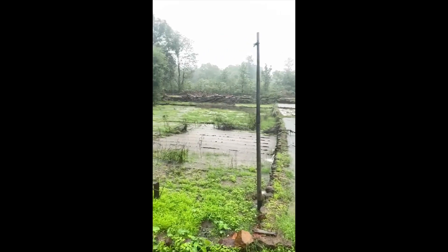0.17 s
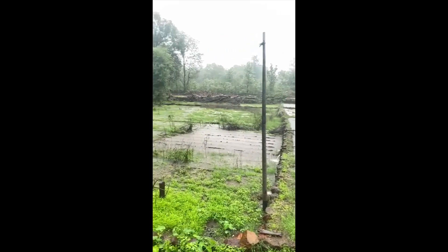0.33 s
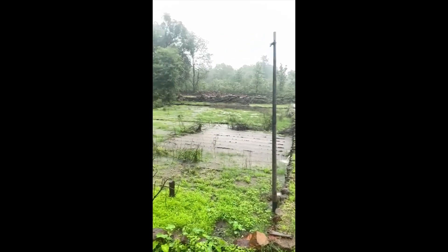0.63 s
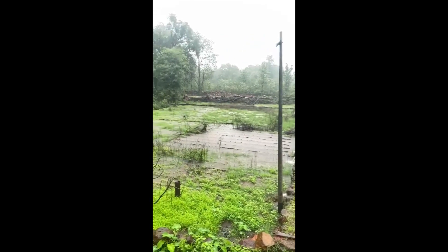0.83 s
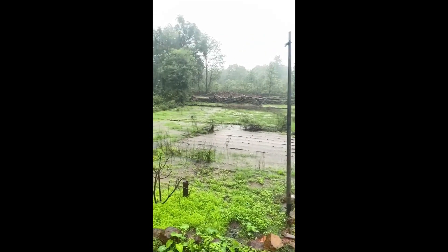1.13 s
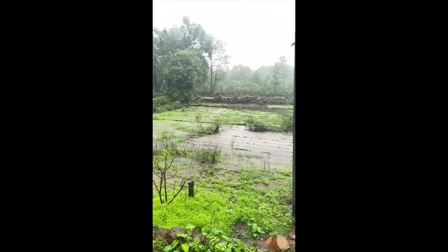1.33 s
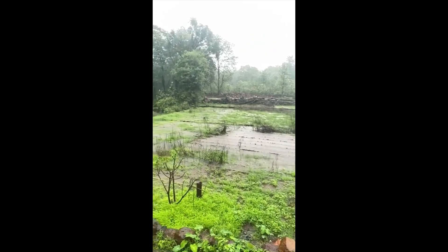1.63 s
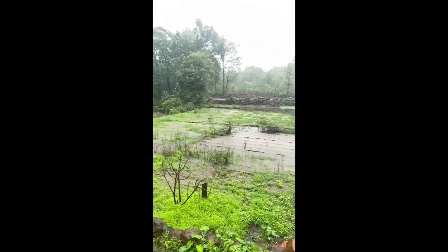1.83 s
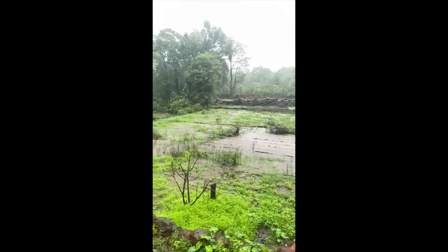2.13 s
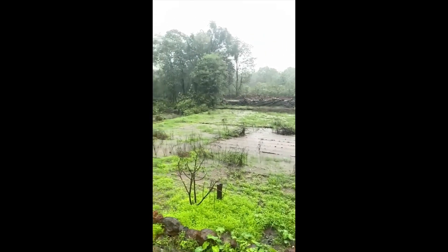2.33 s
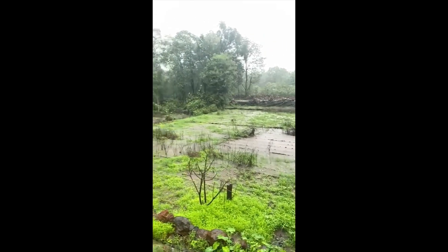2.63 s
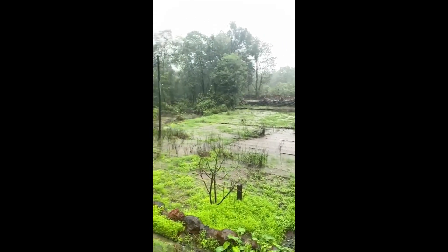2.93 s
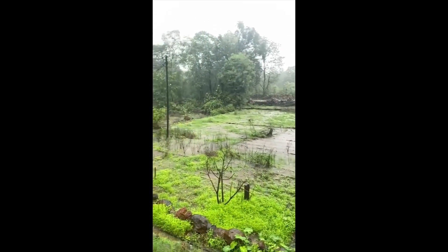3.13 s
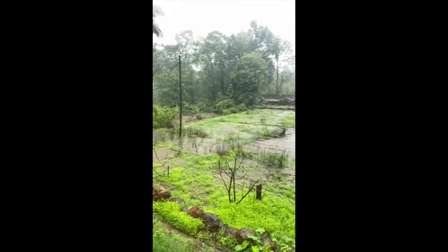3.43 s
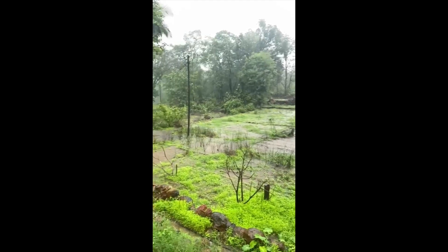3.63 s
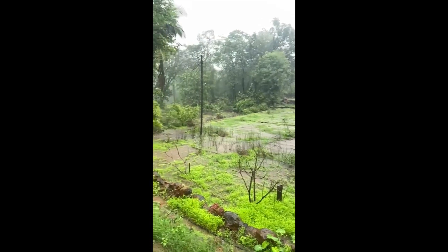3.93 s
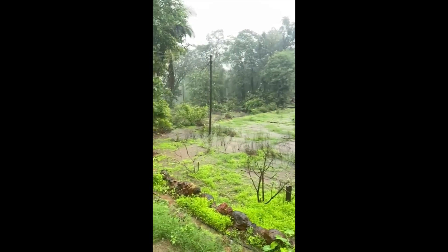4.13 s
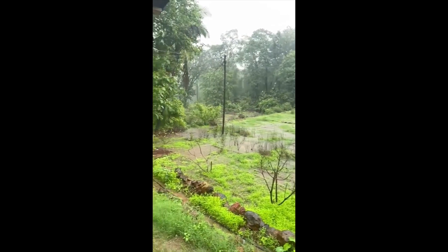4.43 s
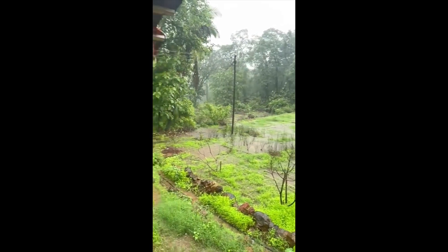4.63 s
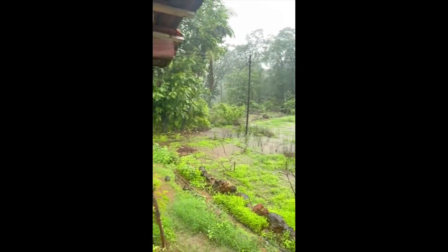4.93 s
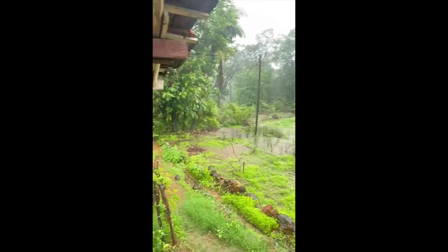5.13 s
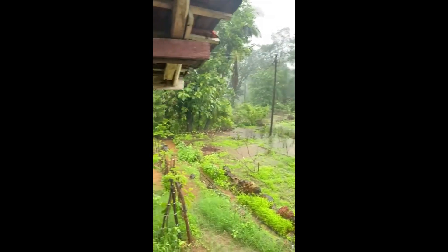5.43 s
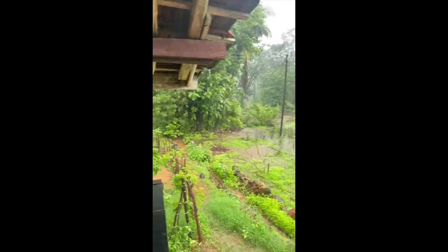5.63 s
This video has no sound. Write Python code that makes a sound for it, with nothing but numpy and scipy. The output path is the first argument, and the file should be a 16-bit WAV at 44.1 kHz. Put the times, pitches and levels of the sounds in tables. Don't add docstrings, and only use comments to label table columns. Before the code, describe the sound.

Continuous downpour in an open rural place, captured by a small handheld stereo microphone under the eaves. Far rain merges into a roar while nearer splashes crackle densely. Sharp drops snap close by, strongest before two seconds and again at five. Low hollow booms come mostly in the first two seconds; a very faint thin insect whine barely surfaces. The rain never pauses.

```python
import sys
import numpy as np
from scipy import signal
from scipy.fft import rfft, irfft, dct, next_fast_len
from scipy.io import wavfile
from scipy.ndimage import uniform_filter1d, map_coordinates

SR = 44100
rng = np.random.default_rng(int(sys.argv[2]) if len(sys.argv) > 2 else 0)


def wav_out(sig):
    wavfile.write(sys.argv[1], SR, np.round(np.clip(np.atleast_2d(sig).T, -1, 1) * 32767).astype(np.int16))


def attenuation_scalar(level_db):
    decades = np.asarray(level_db, float) / 20
    return 10 ** decades


N = 254456

# [t/s, level/dB]
RAIN_STRENGTH = [
    (0.0, -23.5),
    (0.98, -24),
    (1.04, -24.5),
    (1.11, -23),
    (1.61, -24),
    (5.13, -23.5),
    (5.17, -23),
    (5.77, -23.5),
]
# [f/Hz, density/dB per Hz]
ROAR_MID = [(20, -64), (40, -58.5), (60, -45.5), (100, -46.5), (200, -43), (260, -44), (420, -42.5),
            (510, -45), (700, -43), (800, -45.5), (1400, -45.5)]
ROAR_SIDE = [(20, -80), (40, -68), (60, -60), (100, -72), (150, -68.5), (250, -60.5), (400, -54.5),
             (700, -51.5), (1400, -52)]
PATTER_MID = [(800, -47), (1700, -49), (2400, -47.5), (3100, -50), (4000, -50.5), (4700, -52.5),
              (5400, -51.5), (6000, -54.5), (6500, -64.5), (8200, -67.5), (8800, -59.5), (9400, -58.5),
              (11600, -61.5), (12400, -72.5)]
PATTER_SIDE = [(800, -49.5), (1600, -55.5), (1850, -59), (2400, -50), (3100, -50), (4000, -54.5),
               (4600, -55), (5350, -57), (6500, -54), (7900, -56.5), (8900, -57.5), (9400, -72),
               (9900, -62.5), (10900, -62), (12400, -73)]
# [f/Hz, width/Hz, boost/dB]
ROOF_HOLLOW = [
    (59, 10, 4),
    (145, 14, 7),
    (175, 24, 3),
    (220, 10, 3),
]
# [f/Hz, lean to the left/-1..1]
SIDE_LEAN = [(150, -0.0081), (340, -0.79), (700, -.1), (1200, -0.012), (2000, -0.066)]
# [f/Hz, lag of one port/-1..1]
SIDE_LAG = [(700, 0.18), (1400, -0.26), (2100, 0.2), (3100, -0.072), (4100, 0.15), (4900, 0.038),
            (6100, 0.63), (6800, 0.48), (7900, 0.069), (8800, 0.24), (9600, -0.11), (10300, 0.49),
            (11200, 0.37)]
# [t/s, peak/dB, f/Hz, ring/cycles, pan L-R/dB]
NEAR_DROPS = [(.086, -26, 5000, 2, -10), (.471, -14, 2650, 2.6, -8), (0.479, -17, 4000, 1.3, 0),
              (.600, -13, 3870, 1.3, -7), (1.097, -15, 4570, 3.6, -5), (1.107, -14, 4570, 2.7, 9),
              (1.7087, -5.5, 7400, 2.5, -1), (1.7083, -17, 4000, 1.5, -4), (1.7086, -15, 5700, 1.5, 0),
              (1.7089, -16, 9900, 1.5, 0), (2.925, -17, 5040, 0.91, -6), (2.891, -16, 3980, 1.6, 5),
              (3.3662, -12, 7310, 2, -2), (3.3663, -14, 9700, 4, -3), (3.3684, -17, 9800, 3, -3),
              (3.5572, -13, 2680, 1.5, -1), (3.5578, -11, 4740, 2.1, -2), (3.5625, -16, 5170, 4, -9),
              (3.742, -18, 4970, 1.8, 3), (4.12, -20, 2550, 30, 6), (4.221, -21, 2940, 20, -5),
              (4.3217, -11, 5200, 3, 5), (4.398, -25, 5000, 2.4, -3), (5.0116, -6, 6900, 1.8, 0),
              (5.252, -19, 5000, 2, -6), (5.262, -18, 5040, 1.5, 2), (5.631, -22, 5000, 2, 6)]
# [t/s, peak/dB, f/Hz, ring/cycles, pan L-R/dB]
SMALL_DROPS = [(0.024, -17, 3180, 2.5, 3), (0.2131, -19, 4540, 3, 7), (0.7044, -18, 2680, 2.7, -10),
               (1.1571, -20, 4170, 3, 7), (1.8685, -21, 4350, 3.7, -6), (2.6743, -21, 2810, 2.8, -9),
               (2.8568, -22, 2730, 4.6, 14), (3.1225, -18, 2780, 2.7, -5), (3.3287, -23, 3170, 3, -9),
               (3.3889, -18, 2700, 3, -6), (3.5944, -24, 3140, 3, -8), (3.611, -22, 2870, 3, 6),
               (3.7337, -17, 3170, 3, -5), (3.839, -23, 2780, 3, 5), (3.9354, -19, 2620, 3, -1),
               (4.031, -23, 10150, 3, -2), (4.4276, -22, 4130, 3, 4), (4.513, -23, 4500, 3, -2),
               (4.8593, -19, 2970, 2.3, 13), (4.897, -29, 10400, 3, 5), (5.1497, -20, 2890, 3, -2),
               (5.1783, -23, 3080, 3, -4), (5.271, -22, 4310, 3, 9), (5.45, -22, 4570, 3, -1),
               (5.5024, -27, 9820, 3, 8)]
# [f/Hz, phase/rad]
PORT_PHASE = [(2500, 1.3), (5300, 0.69), (7000, 3.5), (8200, 2.4), (9500, 6)]
# [start/s, end/s, f/Hz, level/dB]
INSECT_NOTES = [
    (2.248, 2.42, 11545, -60),
    (3.14, 3.36, 11545, -59),
    (5.02, 5.21, 11600, -64),
]
# [middle/s, length/s, f/Hz, level/dB]
EAVES_BOOMS = [(.9, 2.2, 147.3, -39), (.05, 0.24, 161, -29), (0.544, .1, 167.8, -28),
               (0.877, 0.25, 146, -30), (1.252, 0.24, 150, -26.5), (1.488, 0.1, 169, -29),
               (1.751, 0.052, 160.2, -27), (1.832, 0.079, 170, -31), (2.4, .15, 153, -33),
               (2.518, 0.29, 56.4, -40), (2.91, 0.058, 62, -33), (4.004, .08, 148.7, -29),
               (4.484, 0.19, 149, -32), (4.552, .12, 215, -30), (5.17, 0.087, 221, -32),
               (5.18, 0.11, 150.3, -30), (5.198, 0.51, 57, -43), (5.62, 0.27, 57, -39)]
# [start/s, end/s]
MID_SIDE_SPANS = [(0.01, 0.19), (0.68, 0.98), (1.75, 1.86), (2.45, 2.54), (2.63, 2.89), (2.98, 3.3),
                  (3.4, 3.51), (4.35, 4.53), (4.68, 4.72)]
# [f/Hz, grain/dB]
GRAIN_STEP = [(200, -31), (900, -14), (1600, -11), (5000, -9), (11000, -8)]
# [start/s, end/s]
RICH_SPANS = [(0.077, 0.1), (0.379, 0.402), (0.449, 0.495), (0.658, 0.704), (1.075, 1.168), (1.447, 1.493),
              (1.517, 1.563), (1.679, 1.726), (2.027, 2.051), (2.213, 2.26), (2.399, 2.422), (2.608, 2.654),
              (2.771, 2.794), (2.817, 2.84), (2.933, 2.98), (3.049, 3.072), (3.142, 3.212), (3.351, 3.397),
              (3.537, 3.583), (3.769, 3.792), (3.908, 3.932), (4.094, 4.14), (4.257, 4.349), (4.419, 4.442),
              (4.744, 4.814), (4.93, 5.023), (5.255, 5.301), (5.394, 5.441), (5.557, 5.603)]
# [start/s, end/s, low edge/Hz]
BAND_FILLS = [(0.031, 0.077, 6460), (0.054, 0.077, 6895), (0.054, 0.123, 7580), (0.681, 0.704, 6460),
              (0.82, 0.866, 6460), (0.843, 0.89, 6895), (0.843, 0.89, 7580), (0.89, 0.913, 6460),
              (1.029, 1.075, 7580), (1.052, 1.099, 6895), (1.052, 1.145, 6460), (1.261, 1.284, 6460),
              (1.633, 1.656, 6460), (1.633, 1.656, 6895), (1.679, 1.726, 6460), (1.679, 1.749, 6895),
              (1.679, 1.749, 7580), (2.074, 2.097, 6460), (2.283, 2.306, 6460), (2.306, 2.329, 7580),
              (2.376, 2.422, 6460), (2.445, 2.469, 6460), (2.608, 2.654, 6460), (2.608, 2.654, 7580),
              (2.608, 2.678, 6895), (2.771, 2.794, 6460), (2.794, 2.817, 7580), (2.817, 2.84, 6895),
              (2.933, 2.956, 6460), (2.933, 2.956, 7580), (2.956, 3.026, 6895), (2.98, 3.026, 6460),
              (3.072, 3.096, 6460), (3.328, 3.397, 6460), (3.351, 3.374, 6895), (3.351, 3.374, 7580),
              (3.467, 3.49, 6460), (3.467, 3.49, 7580), (3.56, 3.606, 6460), (3.653, 3.676, 7580),
              (3.746, 3.792, 6895), (3.769, 3.792, 6460), (3.769, 3.792, 7580), (3.862, 3.885, 6460),
              (4.164, 4.187, 6895), (4.233, 4.326, 6460), (4.233, 4.396, 6895), (4.28, 4.326, 7580),
              (4.373, 4.419, 6460), (4.489, 4.512, 6460), (4.628, 4.651, 6895), (4.628, 4.675, 6460),
              (4.628, 4.675, 7580), (4.767, 4.791, 6460), (4.767, 4.791, 7580), (4.86, 4.884, 7580),
              (4.976, 5.023, 6460), (4.976, 5.023, 6895), (4.976, 5.023, 7580), (5.255, 5.278, 6460)]
# [start/s, end/s]
LEAN_SPANS = [(0.077, 0.147), (0.17, 0.193), (0.24, 0.449), (0.797, 0.82), (1.029, 1.052), (1.122, 1.192),
              (1.308, 1.331), (1.447, 1.47), (1.586, 1.633), (1.772, 1.888), (1.911, 1.958), (2.051, 2.12),
              (2.19, 2.353), (2.515, 2.631), (2.724, 2.771), (2.84, 2.863), (2.956, 3.003), (3.072, 3.142),
              (3.792, 3.815), (4.001, 4.024), (4.187, 4.233), (4.257, 4.28), (4.326, 4.373), (4.396, 4.489),
              (4.582, 4.628), (4.837, 4.93), (5.162, 5.185), (5.232, 5.255), (5.348, 5.487), (5.534, 5.627),
              (5.719, 5.743)]


def unit(x):
    return x / np.sqrt(np.mean(x ** 2) + 1e-20)


def along(points, hz):
    f, v = np.transpose(points)
    return np.interp(np.log(hz + 1), np.log(f + 1), v)


def wobble(knots_per_s):
    knots = rng.standard_normal(int(N * 20 / SR) + 4)
    return map_coordinates(knots, [np.arange(N) * min(knots_per_s, 20) / SR])


def insect():
    t = np.arange(N) / SR
    out = np.zeros(N)
    for start, end, hz, db in INSECT_NOTES:
        swell = np.clip(np.minimum(t - start, end - t) / 0.02, 0, 1)
        out += attenuation_scalar(db + 13) * swell * np.sin(2 * np.pi * hz * t)
    return out


def booms():
    t = np.arange(N) / SR
    wavered_s = np.cumsum(1 + 0.06 * wobble(19)) / SR
    out = np.zeros(N)
    for middle, length, hz, db in EAVES_BOOMS:
        swell = np.cos(np.pi * np.clip((t - middle) / length, -0.5, 0.5)) ** 2
        out += attenuation_scalar(db + 1) * swell * np.sin(2 * np.pi * hz * wavered_s)
    return out


def drops():
    crack_hz, crack_db, crack_s = 9300, -16, 0.00018
    lead = 100
    t = np.arange(-lead, 2000) / SR
    halves = np.array([[0.5], [-0.5]])
    crack = attenuation_scalar(crack_db) * np.exp(-abs(t) / crack_s) * np.cos(2 * np.pi * crack_hz * t)
    out = np.zeros((2, N + SR))
    for s, db, hz, cycles, pan_db in NEAR_DROPS + SMALL_DROPS:
        bell = np.where(t < 0, np.exp(-(0.56 * t * hz) ** 2), np.exp(-abs(t) * hz / cycles))
        tick = bell * np.cos(2 * np.pi * hz * t + halves * along(PORT_PHASE, hz)) + crack
        scatter = np.diff(rng.standard_normal((2, len(t) + 1)))
        wet = attenuation_scalar(-20.0 - 60 * t / 0.024) * (t > 0) * scatter
        start = round(s * SR) - lead
        out[:, start:start + len(t)] += attenuation_scalar(db + halves * pan_db) * (tick + wet)
    return out[:, :N]


def patchy(depth_db):
    z = signal.stft(rng.standard_normal((2, N)), nperseg=512)[2]
    field = uniform_filter1d(rng.standard_normal(z.shape[1:]), size=8, axis=0)
    field = uniform_filter1d(field, size=10, axis=1)
    return unit(signal.istft(z * attenuation_scalar(depth_db * unit(field)), nperseg=512)[1][:, :N])


def splashes(count, spread_db, life_s):
    when, big = rng.random((count, 2)).T
    size_db = np.minimum(-2 * spread_db * np.log(1 - big), 36)
    blows = np.bincount((when * N).astype(int), attenuation_scalar(size_db), N)
    decay = np.exp(-np.arange(400) / SR / life_s)
    envelope = np.sqrt(abs(signal.fftconvolve(blows, decay)[:N]))
    burst = envelope * rng.standard_normal((2, N))
    return unit(burst - 0.49 * np.roll(burst, 1, axis=1))


def bubbles(count, hz, spread, cycles):
    when, high, big, side = rng.random((count, 4)).T[:, :, None]
    t = np.arange(1100) / SR
    pitch = hz * np.exp(spread * (2 * high - 1))
    fade = t * pitch / cycles
    envelope = attenuation_scalar(5.6 * big) * np.exp(-fade) * (1 - np.exp(-8 * fade))
    ring = envelope * np.sin(2 * np.pi * pitch * t * (1 + 0.035 * fade))
    at = ((when * N).astype(int) + np.arange(len(t))).ravel()
    pair = [np.bincount(at, (ring * share).ravel(), N)[:N] for share in (side, 1 - side)]
    return unit(np.array(pair))


def ports(pair, mid_points, side_points, shape):
    m = next_fast_len(N + SR // 2)
    hz = np.fft.rfftfreq(m, 1 / SR)
    a, b = rfft(pair, m) * shape(hz)
    link = along(SIDE_LEAN, hz) + 1j * along(SIDE_LAG, hz)
    side = link * a + np.sqrt(np.clip(1 - abs(link) ** 2, 0, 1)) * b
    out = irfft([a * attenuation_scalar(along(mid_points, hz)), side * attenuation_scalar(along(side_points, hz))], m)[:, :N]
    return out / np.std(out[0])


def low_share(hz):
    return 1 / (1 + (hz / 1000) ** 8)


def roar_shape(hz):
    boost_db = sum(db / (1 + (2 * (hz - c) / w) ** 2) for c, w, db in ROOF_HOLLOW)
    return np.sqrt(low_share(hz)) * attenuation_scalar(boost_db)


def roar(strength_db, turn_s):
    out = ports(patchy(depth_db=0.48), ROAR_MID, ROAR_SIDE, roar_shape)
    deep = signal.sosfiltfilt(signal.butter(4, 62, fs=SR, output="sos"), out)
    out += (attenuation_scalar(0.7 * turn_s) - 1) * deep
    return attenuation_scalar(strength_db - 3 - 0.3 * turn_s + 0.87 * wobble(9)) * out


def patter(strength_db, turn_s):
    stir = patchy(depth_db=1.27)
    stir += attenuation_scalar(-16.0) * bubbles(count=1500, hz=2493, spread=0.9, cycles=20)
    stir += attenuation_scalar(-6.5) * splashes(count=4000, spread_db=5.5, life_s=0.0008)
    out = ports(stir, PATTER_MID, PATTER_SIDE, lambda hz: np.sqrt(1 - low_share(hz)))
    spray = signal.sosfiltfilt(signal.butter(2, 5000, "high", fs=SR, output="sos"), out)
    spray_db = 0.33 * turn_s + 0.9 * wobble(18)
    out += (attenuation_scalar(spray_db - np.mean(spray_db)) - 1) * spray
    return attenuation_scalar(strength_db - 2 - 0.25 * wobble(9)) * out


def rain():
    t = np.arange(N) / SR
    strength_db = np.interp(t, *np.transpose(RAIN_STRENGTH))
    turn_s = t - t.mean()
    mid, side = roar(strength_db, turn_s) + patter(strength_db, turn_s)
    return np.array([mid + side, mid - side])


def scene():
    return insect() + booms() + drops() + rain()


def lapped(x, frame, grid):
    hop = frame // 2
    x = np.pad(x, ((0, 0), (frame - grid, frame)))
    n = np.arange(frame)
    starts = np.arange(x.shape[1] // hop - 1)[:, None] * hop
    frames = x[:, starts + n] * np.sin(np.pi * (n + 0.5) / frame)
    a, b, c, d = np.split(frames, 4, axis=-1)
    return dct(np.concatenate([-c[..., ::-1] - d, a - b[..., ::-1]], axis=-1), 4, norm="ortho")


def unlapped(z, frame, grid):
    hop = frame // 2
    u, v = np.split(dct(z, 4, norm="ortho"), 2, axis=-1)
    window = np.sin(np.pi * (np.arange(frame) + 0.5) / frame)
    frames = np.concatenate([v, -v[..., ::-1], -u[..., ::-1], -u], axis=-1) * window
    out = frames[:, 1:, :hop] + frames[:, :-1, hop:]
    return out.reshape(2, -1)[:, hop - grid:][:, :N]


def thin_bands(x, weak_mid_db, weak_side_db, dead_db, faint_db, waver_db):
    frame, hop, band, grid = 2048, 1024, 16, 836
    z = lapped(np.array([x[0] + x[1], x[0] - x[1]]) / 2, frame, grid)
    count = z.shape[1]
    t = ((np.arange(count)[:, None] - 1) * hop + grid) / SR
    f = (np.arange(hop) + 0.5) * SR / frame
    line_db = 10 * np.log10(z ** 2 + 1e-20)
    band_power = (z ** 2).reshape(2, count, -1, band).mean(-1)
    band_db = 10 * np.log10(band_power + 1e-20).repeat(band, -1)
    under = band_db - band_db[::-1]
    chance = uniform_filter1d(rng.standard_normal((2, count, hop // band)), size=3, axis=1)
    waver = waver_db * unit(chance).repeat(band, -1)

    def box(a, b, lo, hi):
        return (t > a) & (t < b) & (f >= lo) & (f < hi)

    rich = sum(box(a, b, 0, SR) for a, b in RICH_SPANS) > 0
    keep = (under > waver + [[[weak_mid_db]], [[weak_side_db]]]) | (f < [[[5700]], [[1400]]])
    keep[0] &= (f < 6460) | (f >= 8270)
    keep[0] |= box(0, N, 8270, 8960)
    keep[0] &= sum(box(a, b, 8270, 8900 + 35 * waver[0][:, [400]]) for a, b in LEAN_SPANS) == 0
    rim_lines = line_db[0] > band_db[0] + waver[0] - (f - 8450) / 60
    keep[0] &= ~box(0, N, 8270, 9200) | rim_lines
    keep[0] &= (f < 6440 - 35 * waver[0][:, [290]]) | (f > 8000)
    keep[1] &= ~box(0, N, 8960, 9650) | (waver[1][:, [430]] < -0.5) | rich
    keep[1] &= (f > 170) | (waver[1] < 2.6)
    keep[1] &= (band_db[1] > faint_db + waver[1]) | (f < 11030) | rich
    masked = sum(box(a + 0.02, b - 0.04, 11030, 11720) & (abs(f - c) > 40) for a, b, c, _ in INSECT_NOTES)
    keep[0] &= masked == 0
    keep &= (f < 11720) | (rich & (f < 12410))
    alive = line_db > band_db[::-1] + dead_db + [[[5]], [[0]]] + waver
    keep &= (under > 0) | alive | (f < 5700)
    keep &= (line_db > waver + faint_db + [[[0]], [[-4]]]) | (f < 11720)
    fill = sum(box(a, b, lo, min(lo + 688, 6895 if lo < 6800 else SR)) for a, b, lo in BAND_FILLS) > 0
    keep[0] |= fill & (line_db[0] > band_db[0] + waver[0] - 2)
    sharp_s = [row[0] for row in NEAR_DROPS if row[2] > 7300]
    keep |= sum(box(s - 0.015, s + 0.015, 5700, 12580) for s in sharp_s) > 0

    mid, side = z * keep
    as_mid_side = sum(box(a, b, 0, SR) for a, b in MID_SIDE_SPANS) > 0
    pair = np.where(as_mid_side, [mid, side], [mid + side, mid - side])
    apart_db = np.where(keep.all(0), 1.5, 0)
    step = attenuation_scalar(band_db.max(0) + along(GRAIN_STEP, f) + [apart_db, -apart_db])
    level = np.floor(abs(pair / step) ** 0.75 + 0.4054) ** (4 / 3)
    a, b = np.sign(pair) * step * level
    pair = np.where(as_mid_side, [a, b], [(a + b) / 2, (a - b) / 2])
    near = uniform_filter1d(uniform_filter1d(abs(pair), size=5, axis=2), size=3, axis=1)
    mid, side = pair + attenuation_scalar(-31) * near * rng.standard_normal(z.shape)
    return unlapped(np.array([mid + side, mid - side]), frame, grid)


def roll_off(x):
    return signal.sosfilt(signal.butter(12, 12770, fs=SR, output="sos"), x)


def record(dry):
    mix = thin_bands(dry, weak_mid_db=-8.5, weak_side_db=-9.5, dead_db=-12.5, faint_db=-34.5, waver_db=3.5)
    return roll_off(mix)


dry = scene()
out = record(dry)
wav_out(out)
```